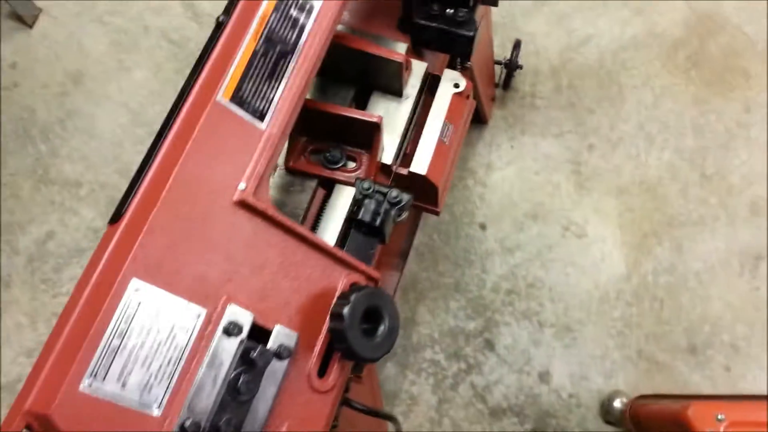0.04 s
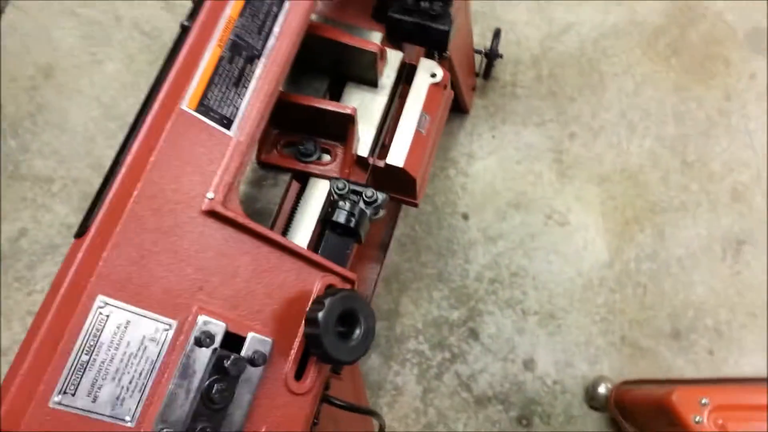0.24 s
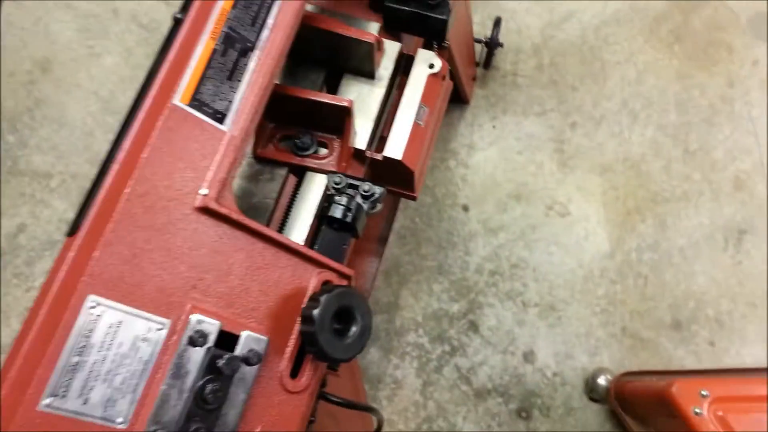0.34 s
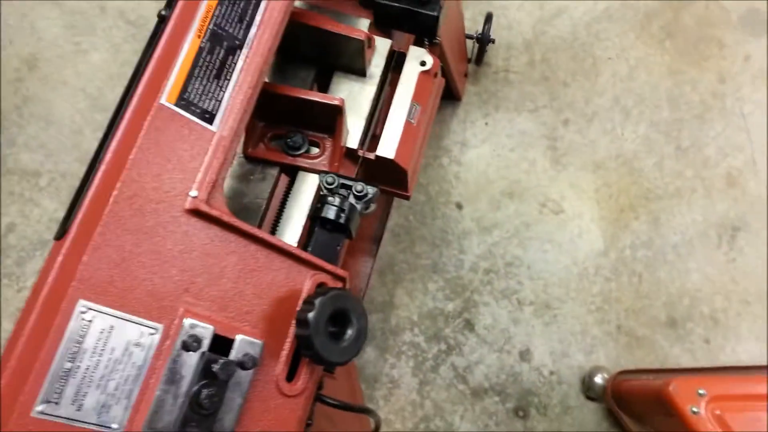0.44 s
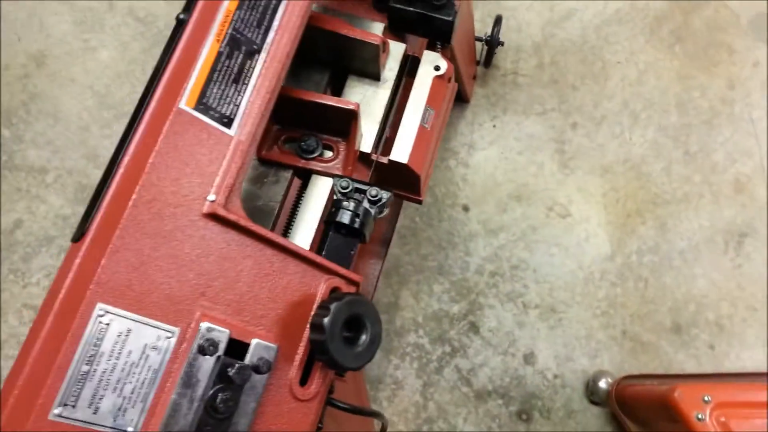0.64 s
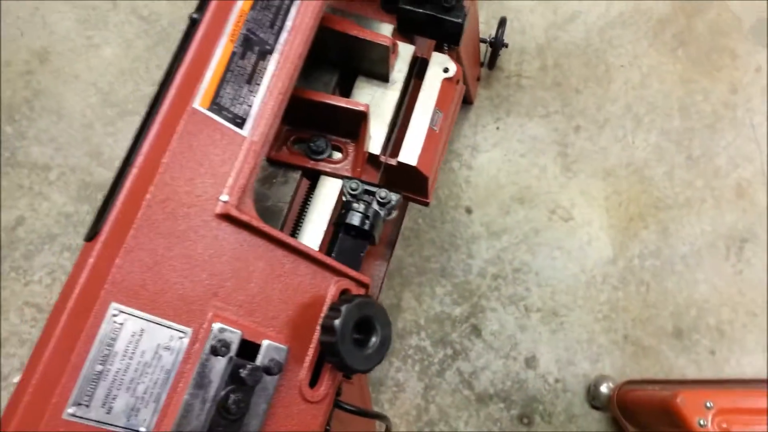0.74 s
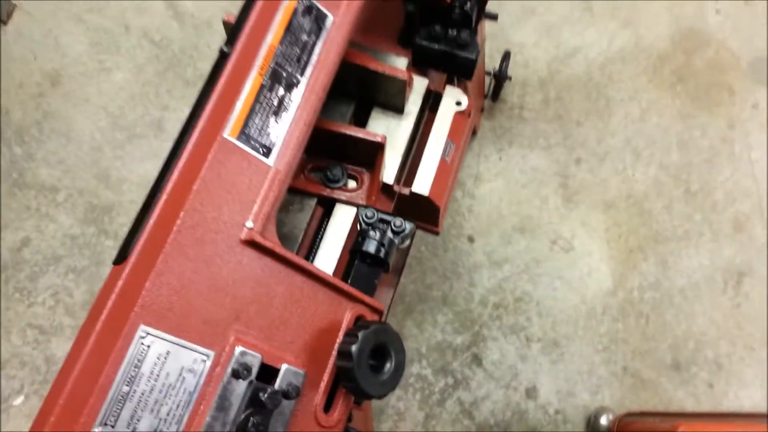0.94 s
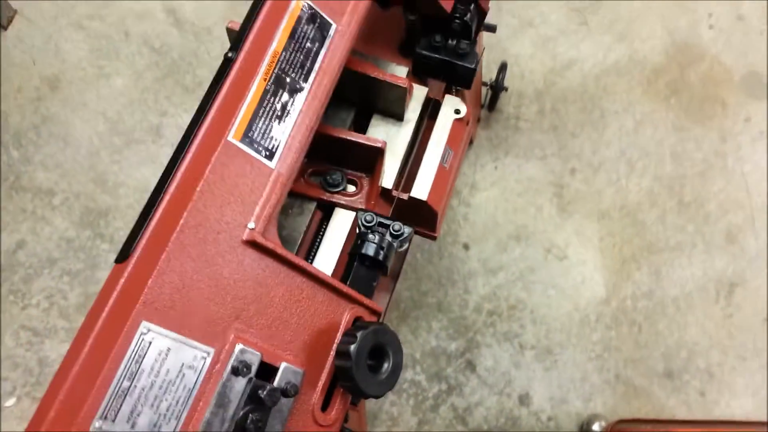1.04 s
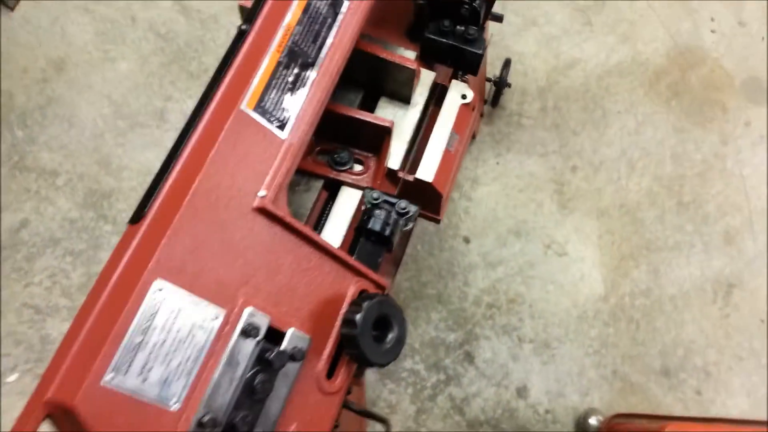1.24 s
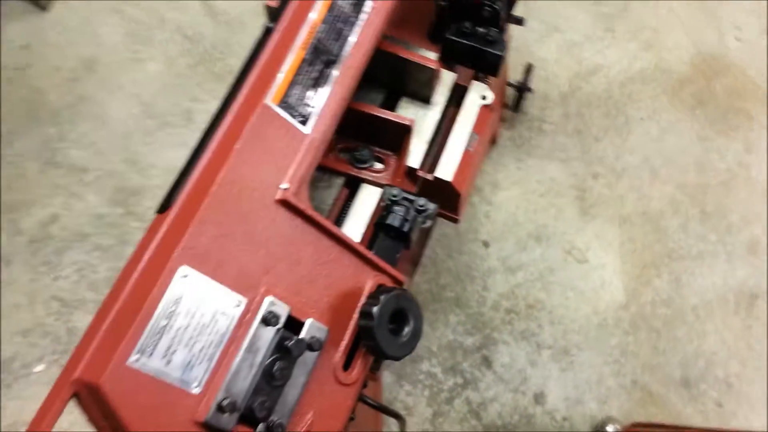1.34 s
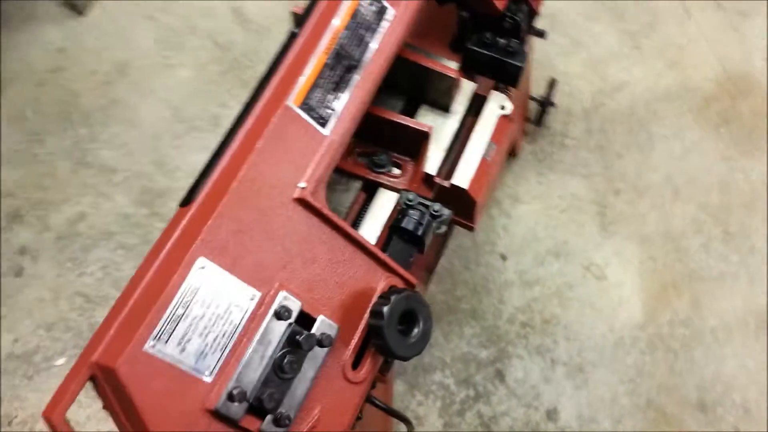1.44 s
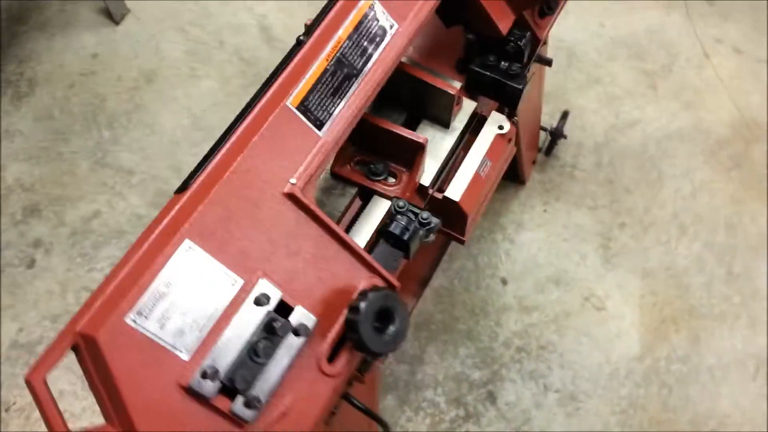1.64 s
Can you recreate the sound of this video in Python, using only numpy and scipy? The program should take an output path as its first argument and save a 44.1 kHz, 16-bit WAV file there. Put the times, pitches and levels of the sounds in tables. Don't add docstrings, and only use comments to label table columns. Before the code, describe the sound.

Steel frame struck once, clanking and rattling briefly, then faint shoe scuffs on a concrete floor

```python
import sys
import numpy as np
from scipy import signal
from scipy.fft import rfft, irfft
from scipy.io import wavfile
from scipy.ndimage import uniform_filter1d

SR = 44100
rng = np.random.default_rng(int(sys.argv[2]) if len(sys.argv) > 2 else 0)


def digitize_waveform(pressure):
    field = np.atleast_2d(pressure).T
    bounded = np.clip(field, -1, 1)
    quanta = np.round(bounded * 32767).astype(np.int16)
    wavfile.write(sys.argv[1], SR, quanta)


def level_to_linear(level):
    exponent = np.asarray(level, float) / 20
    return 10 ** exponent


N = 74970

# (time [s], level [dB], brightness [dB])
IMPACTS = [
    (.2012, -5, -1.5),
    (0.2209, -16.5, -12),
    (.2490, -12, -29),
    (.3050, -13, -3),
    (.3700, -17, -22),
    (.4250, -27.5, -33),
    (.5070, -41, -5),
    (0.5557, -44.5, -9),
    (0.6646, -61, -7),
]


def rms_one(x):
    return x / np.sqrt(np.mean(x ** 2) + 1e-20)


def at_hz(points, hz):
    table_hz, values = np.array(points)[:, 0], np.array(points)[:, 1]
    return np.interp(np.log(hz), np.log(table_hz), values)


def band_pass(x, low, high, order):
    return signal.sosfilt(signal.butter(order, [low, high], "band", fs=SR, output="sos"), x)


def high_pass(x, hz, order):
    return signal.sosfilt(signal.butter(order, hz, "high", fs=SR, output="sos"), x)


def clicks_at(s, gains):
    out = np.zeros(N)
    np.add.at(out, (np.asarray(s) * SR).astype(int), gains)
    return out


def ring(clicks, hz, t60):
    r = level_to_linear(-60 / (t60 * SR))
    w = 2 * np.pi * hz / SR
    return signal.lfilter([0, np.sin(w)], [1, -2 * r * np.cos(w), r * r], clicks + 1e-18)


def swelling_ring(clicks, hz, t60, rise_s):
    rise_t60 = 1 / (1 / t60 + 1 / (np.log(1000) * rise_s))
    return ring(clicks, hz, t60) - ring(clicks, hz, rise_t60)


def colour(x, spectrum):
    # (frequency [Hz], left minus right [dB])
    port_lean = [(60, -3.5), (180, 0), (550, -4.5), (1650, 9), (4970, 1), (15000, -4.5)]
    hz = np.maximum(np.fft.rfftfreq(N, 1 / SR), 1)
    lean_db = at_hz(port_lean, hz) * np.array([[.5], [-.5]])
    return irfft(rfft(x) * level_to_linear(at_hz(spectrum, hz) + lean_db), N)


def banded_noise(t60_table=None):
    # (frequency [Hz], left-right likeness [0 to 1; values below 0 count as 0])
    ear_likeness = [(60, -0.32), (150, 0.89), (380, 0.94), (950, 0.5), (2380, 0.094), (5980, 0.043),
                    (15000, 0.01)]
    t = np.arange(N) / SR
    edges = 22 * 2 ** np.arange(0, 9.6, .5)
    white = rng.standard_normal((2, 2, N))
    out = 0
    for k, (low, high) in enumerate(zip(edges, edges[1:])):
        mid, side = band_pass(white[k % 2], low, high, 2)
        hz = np.sqrt(low * high)
        alike = np.clip(at_hz(ear_likeness, hz), 0, 1)
        fade = 1 if t60_table is None else level_to_linear(-60 * t / at_hz(t60_table, hz))
        out = out + fade * (np.sqrt(1 + alike) * mid + np.sqrt(1 - alike) * side * [[1], [-1]])
    return out


def convolve(x, response):
    return signal.fftconvolve(np.atleast_2d(x), response, axes=1)[:, :len(x)]


def room(x):
    t60_s = 0.46
    tail = banded_noise([(100, t60_s), (4000, t60_s), (14000, 0.33 * t60_s)])
    return convolve(x, tail / np.sqrt(np.sum(tail ** 2) / 2))


def air():
    # (frequency [Hz], density [dB per Hz])
    air_spectrum = [(15, -61.5), (25, -28), (290, -6), (735, -13.5), (796, -12), (886, -16.5),
                    (2640, -17.5), (3010, -24.5), (14500, -25)]
    return level_to_linear(-58.5) * rms_one(colour(banded_noise(), air_spectrum))


def scuffs():
    # (time [s], rise [s], hold [s], level [dB])
    strokes = [
        (-.06, 0.016, 0.044, -46),
        (1.184, 0.024, 0.069, -50),
        (1.338, 0.044, 0.031, -48),
        (1.66, 0.018, 0.025, -67),
    ]
    # (frequency [Hz], density [dB per Hz])
    grit_spectrum = [(200, -32), (500, -4), (1200, -12), (2100, -0.5), (4500, -7.5), (6500, -22),
                     (9000, -18), (14500, -24.5)]
    # (time [s], length [s], level [dB], frequency [Hz])
    rubs = [
        (1.26, 0.02, -55.5, 4250),
        (1.264, 0.025, -58.5, 850),
        (1.347, 0.033, -52, 755),
        (1.348, 0.088, -62.5, 12000),
    ]
    grit_per_s, spread_db, stop_s = 6000, 3.5, 0.0091
    rub_width, rub_rise_s, room_db = 1.36, 0.0082, -3
    lead = SR // 10
    total = N + lead
    t = (np.arange(total) - lead) / SR

    def stroke(s, rise, hold, db):
        release = np.exp(-np.maximum(t - s - rise - hold, 0) / stop_s)
        return np.clip((t - s) / rise, 0, 1) * release * level_to_linear(db)

    grain = rng.random(total) < grit_per_s / SR
    sign = rng.choice([-1, 1], total)
    grit = grain * sign * level_to_linear(spread_db * np.minimum(rng.exponential(1, total), 4))
    texture = np.pad(rms_one(colour(grit[:N], grit_spectrum)), ((0, 0), (lead, 0)), "wrap")
    direct = sum(stroke(*row) for row in strokes) * texture
    for s, length, db, hz in rubs:
        rub = band_pass(grit, hz / rub_width, min(hz * rub_width, .45 * SR), 2)
        direct = direct + stroke(s, rub_rise_s, length, db) * rms_one(rub)
    return (direct + level_to_linear(room_db) * room(direct.mean(axis=0)))[:, lead:]


def flutter(rate):
    knots = rng.standard_normal(200)
    return level_to_linear(5.5 * np.interp(np.arange(N) / SR * rate % 199, np.arange(200), knots))


def panels():
    # (level [dB], T60 [s])
    panel_modes = [(-3.5, 0.2), (-10.5, .35), (2.5, 0.64), (-19.5, 1.1), (-6.5, 0.74), (-6.5, .38),
                   (-3, 0.37), (-2, 0.37), (-11.5, .4), (-13.5, .35), (-22, .45), (-16, .4), (-35, 1.82),
                   (-46, 1.7)]
    panel_hz = [291, 355, 388, 392, 440, 481, 522, 636, 684, 1174, 1220, 1529, 1625, 3400]
    twin_share, flutter_share, swell_s, room_db = .015, .04, 0.0076, -4.5
    s, hit_db, _ = np.transpose(IMPACTS)
    chance = rng.normal(0, 1, (len(s), 32))
    modes = [(hz, db, t60) for hz, (db, t60) in zip(panel_hz, panel_modes)]
    twins = [(hz * (1 + twin_share * chance[0, k]), db - 4, t60) for k, (hz, db, t60) in enumerate(modes)]
    out = 0
    for k, (hz, db, t60) in enumerate(modes + twins):
        blows = clicks_at(s, level_to_linear(hit_db + db + 2.85 * chance[:, k]))
        mode = swelling_ring(blows, hz, t60, swell_s) * (-1) ** k
        out = out + mode * flutter(flutter_share * hz)
    out = high_pass(out, 120, 1)
    return out * level_to_linear(np.array([[.7], [-.7]])) + level_to_linear(room_db) * room(out)


def contact():
    # (frequency [Hz], level [dB], T60 [s])
    contact_modes = [(4538, -10, .04), (4580, -6, .012), (5010, 1.5, 0.011), (1700, -11, .03),
                     (7854, -15.5, .012), (12000, -22, .008)]
    s, hit_db, bright_db = np.transpose(IMPACTS)
    rebound_db = np.where(s > s[0], -15.5 + bright_db, 0)
    out = 0
    for k, (hz, db, t60) in enumerate(contact_modes):
        blows = clicks_at(s, level_to_linear(hit_db - hit_db[0] + rebound_db + db))
        out = out + swelling_ring(blows, hz, t60, .0008) * (-1) ** k
    return out * level_to_linear(np.array([[2.5], [-2.5]]))


def wash():
    # (frequency [Hz], density [dB per Hz])
    dense_spectrum = [(35, -97.5), (60, -43.5), (390, -2.5), (561, -9), (629, -13.5), (927, -13),
                      (4790, -16), (11100, -35), (14000, -46.5)]
    # (frequency [Hz], T60 [s])
    dense_t60 = [(100, 0.46), (400, 0.44), (1500, 0.51), (4000, 0.28), (12000, 0.24)]
    rise_s, touch_hz = .001, 3000
    s, hit_db, bright_db = np.transpose(IMPACTS)
    rise = 1 - np.exp(-np.arange(N) / SR / rise_s)
    response = colour(banded_noise(dense_t60), dense_spectrum) * rise
    response = response / np.sqrt(np.mean(response[:, :SR // 20] ** 2))
    sharp = clicks_at(s, level_to_linear(hit_db + bright_db))
    dull = clicks_at(s, level_to_linear(hit_db))
    push = sharp + signal.lfilter(*signal.butter(1, touch_hz, fs=SR), dull - sharp)
    return convolve(push, response)


def frame():
    return level_to_linear(-12.5) * panels() + level_to_linear(10) * contact() + level_to_linear(-3) * wash()


def thump():
    return swelling_ring(clicks_at([IMPACTS[0][0]], level_to_linear(-42.5)), 35, .3, .01)


def ticks():
    # (time [s], peak level [dB], frequency [Hz])
    tick_events = [
        (.5070, -40, 6870),
        (.5565, -61, 3000),
        (.6665, -35, 3400),
        (1.3470, -43, 684),
        (1.6445, -44, 577),
        (1.6460, -50, 1400),
        (1.6462, -42, 2600),
        (1.6465, -48, 5520),
    ]
    decay_cycles = 10.6
    return sum(ring(clicks_at([s], level_to_linear(db)), hz, decay_cycles / hz) for s, db, hz in tick_events)


def squeaks():
    # (time [s], length [s], level [dB], frequency [Hz])
    squeak_events = [
        (0.635, .045, -61, 5770),
        (0.638, 0.054, -58, 4340),
    ]
    t = np.arange(N) / SR
    out = np.zeros(N)
    for s, length, db, hz in squeak_events:
        swell = np.sin(np.pi * np.clip((t - s) / length, 0, 1)) ** 2
        out += level_to_linear(db) * swell * np.sin(2 * np.pi * hz * t)
    return out


def whirr():
    # (frequency [Hz], width [Hz], level [dB])
    spring_bands = [(391, 11.5, -54.5), (1656, 170, -69), (3400, 540, -66)]
    start_s, rise_s, hold_s, stop_s, sag_db_per_s = 0.686, 0.057, .31, .03, 17.5
    t = np.arange(N) / SR - start_s
    shape = np.clip(t / rise_s, 0, 1) * np.exp(-np.maximum(t - rise_s - hold_s, 0) / stop_s)
    bands = 0
    for hz, width, db in spring_bands:
        band = band_pass(rng.standard_normal(N), hz - width / 2, hz + width / 2, 1)
        bands = bands + level_to_linear(db) * rms_one(band)
    return shape * level_to_linear(-sag_db_per_s * t) * bands


def scene():
    return air() + scuffs() + frame() + thump() + ticks() + squeaks() + whirr()


def soften(x, rise_s):
    r = np.exp(-1 / (rise_s * SR))
    return signal.lfilter([1 - r], [1, -r], x)


def low_pass(x):
    return signal.sosfilt(signal.butter(12, 15600, fs=SR, output="sos"), x)


def record(dry):
    threshold_db, squeeze, release_db_per_s, attack_s = -33.5, 0.39, 144.5, .002
    dry = high_pass(dry, 25, 2)
    ramp = release_db_per_s * np.arange(N) / SR
    level = 10 * np.log10(uniform_filter1d(np.mean(dry ** 2, axis=0), size=441) + 1e-12)
    held = np.maximum.accumulate(level + ramp) - ramp
    over = np.maximum(held - threshold_db, 0)
    gain = level_to_linear(-squeeze * soften(over, attack_s))
    top_cut = signal.ellip(12, .5, 70, 14600, fs=SR, output="sos")
    return low_pass(signal.sosfilt(top_cut, dry * gain))


dry = scene()
out = record(dry)
digitize_waveform(out)
```